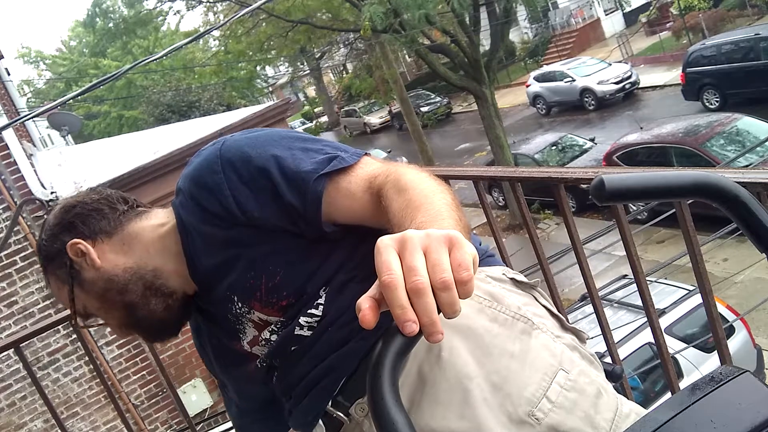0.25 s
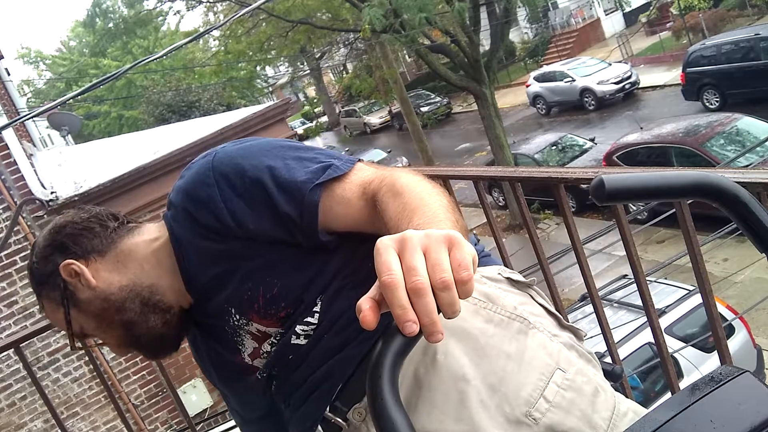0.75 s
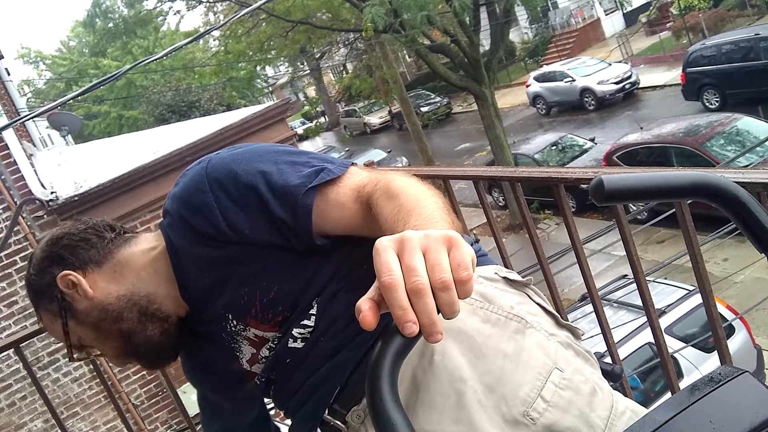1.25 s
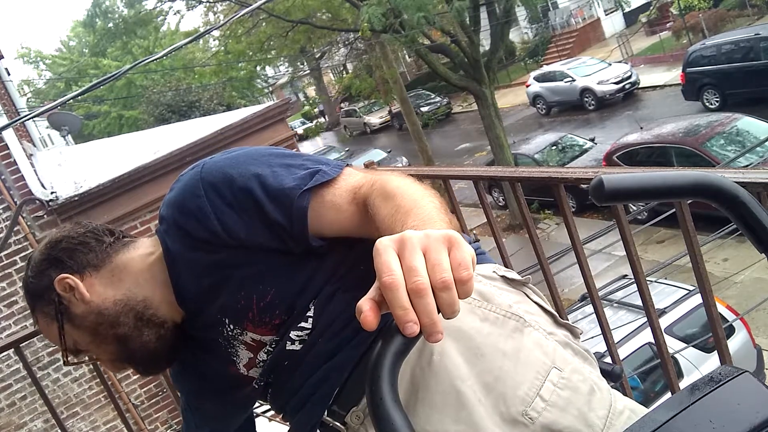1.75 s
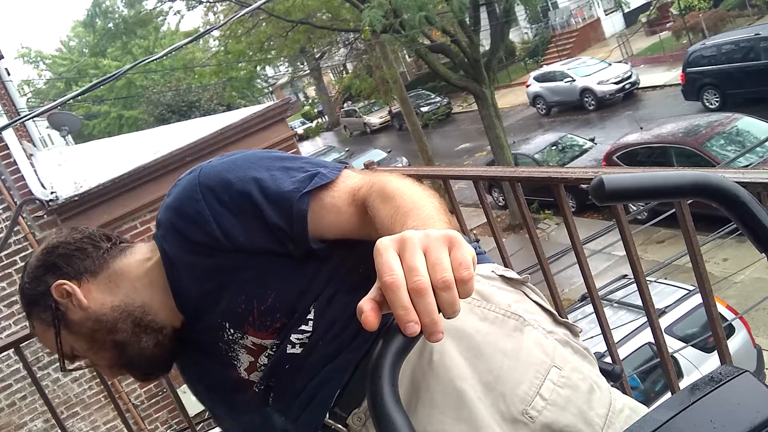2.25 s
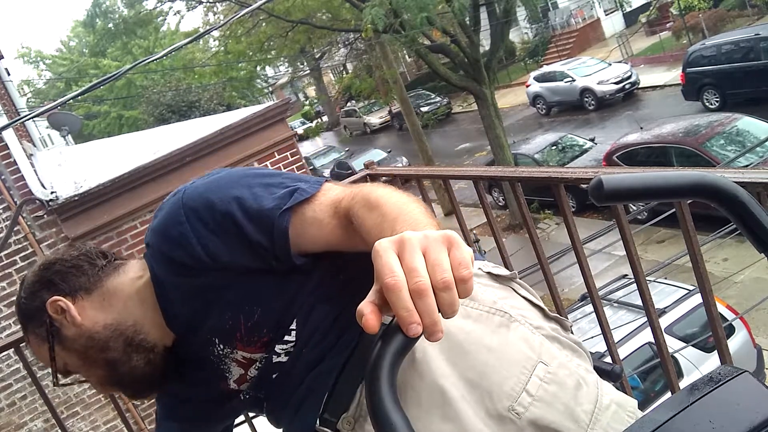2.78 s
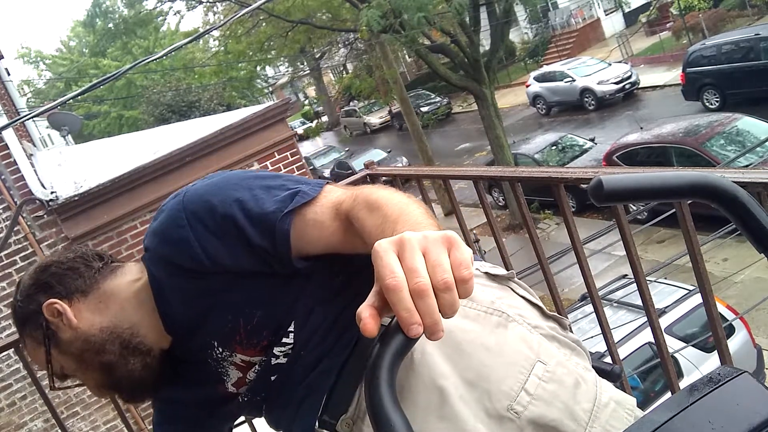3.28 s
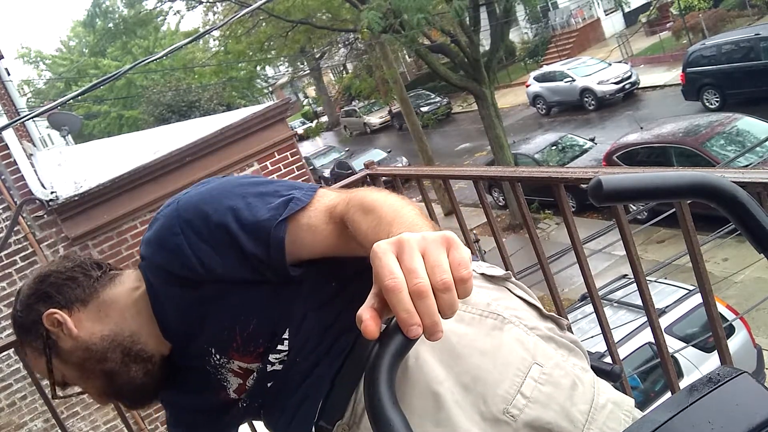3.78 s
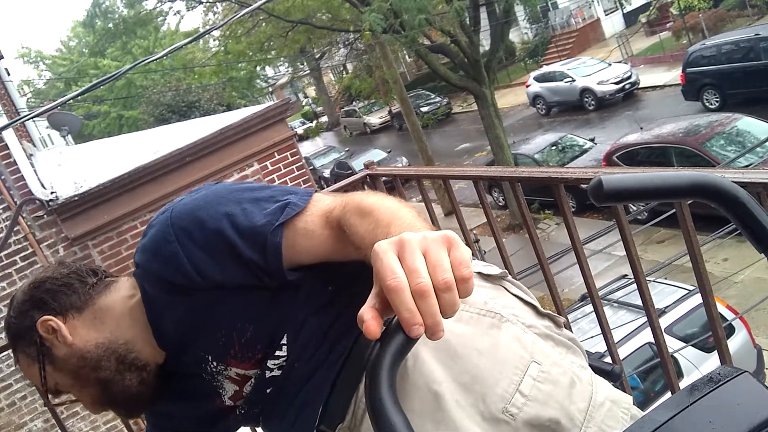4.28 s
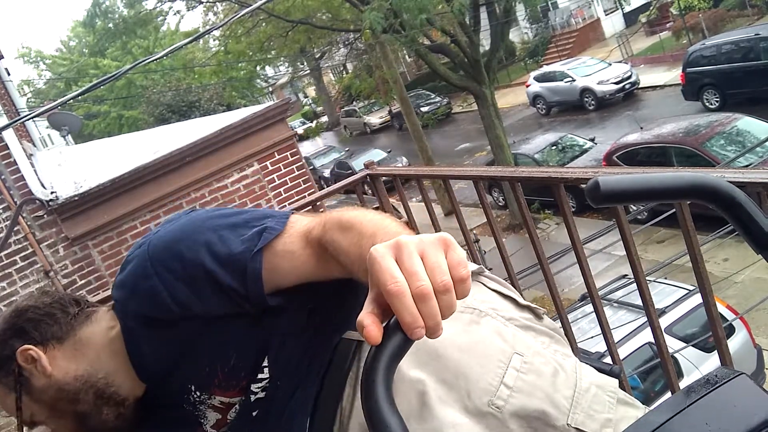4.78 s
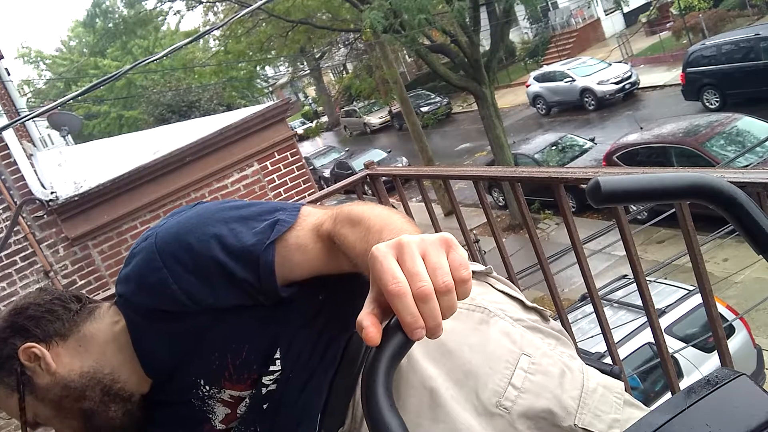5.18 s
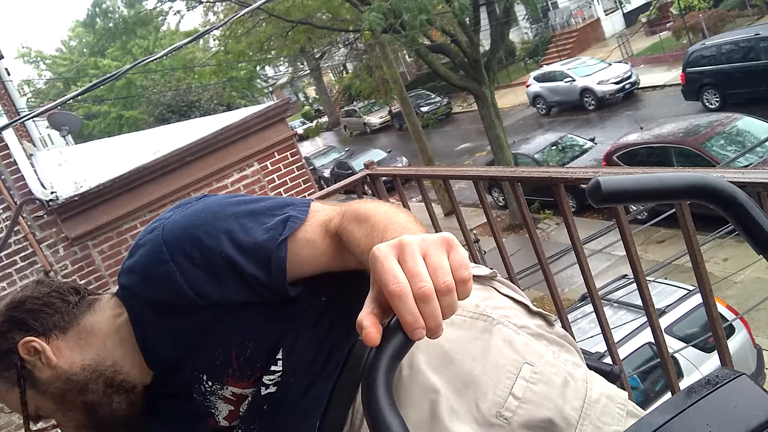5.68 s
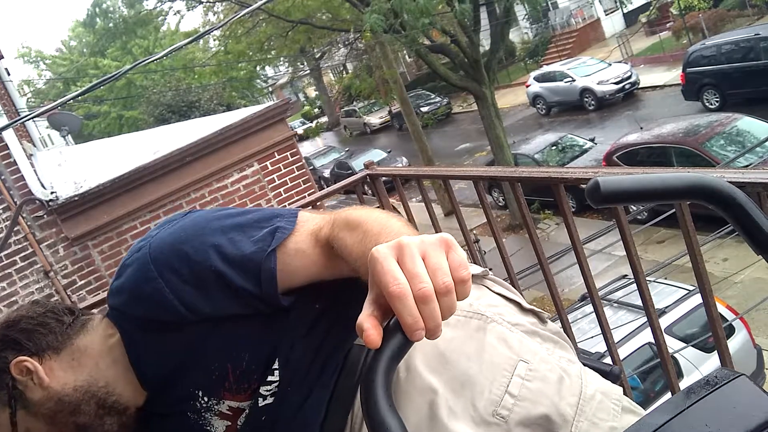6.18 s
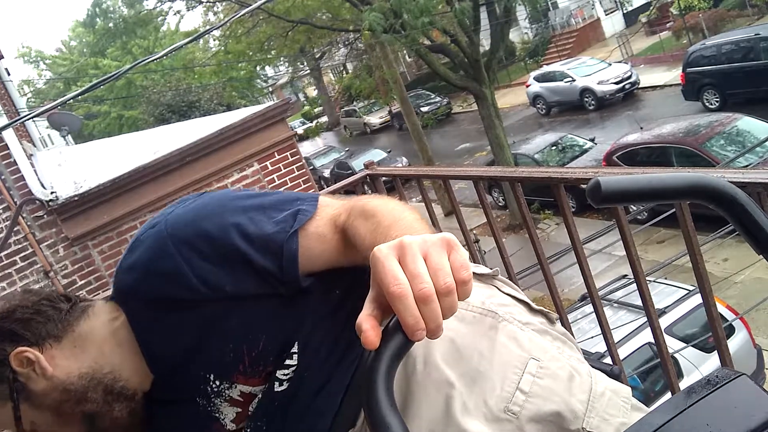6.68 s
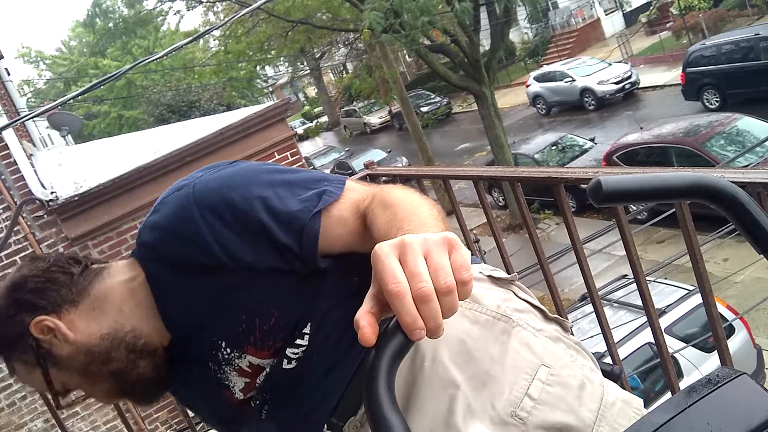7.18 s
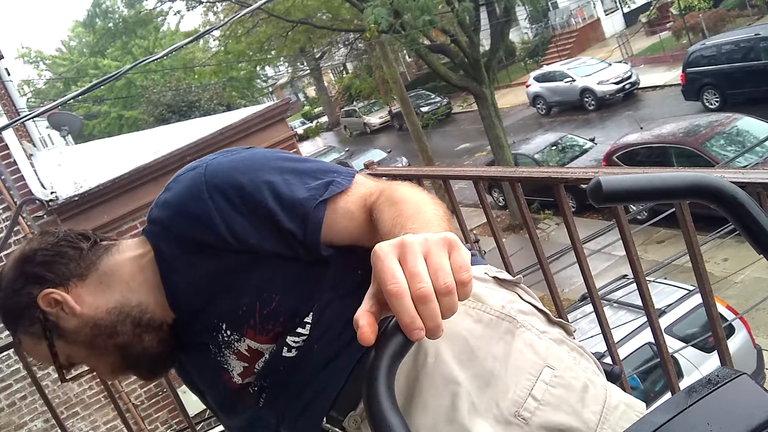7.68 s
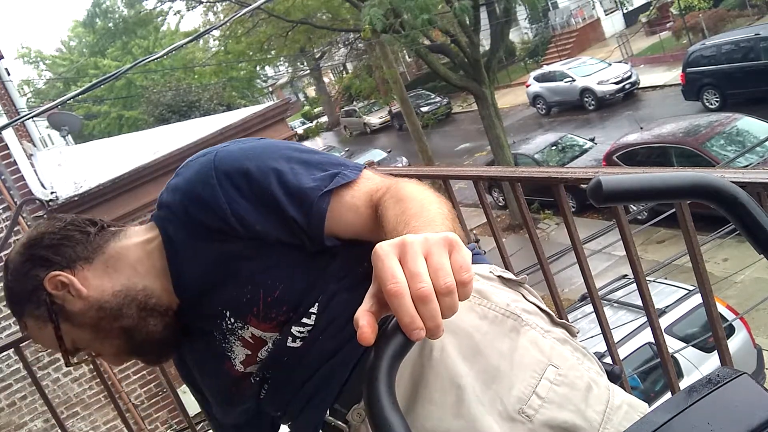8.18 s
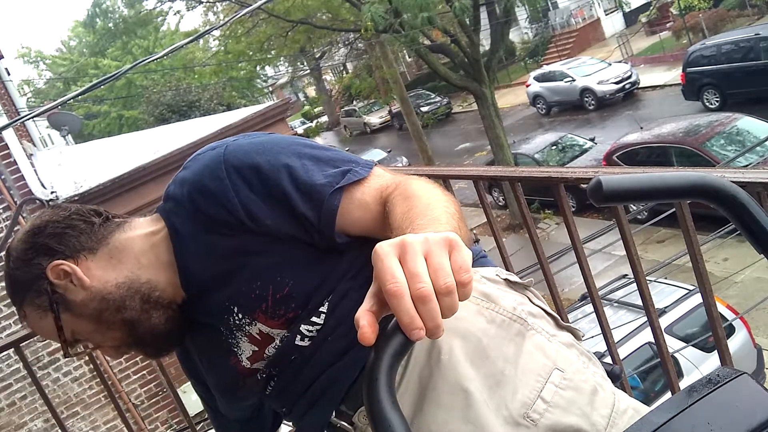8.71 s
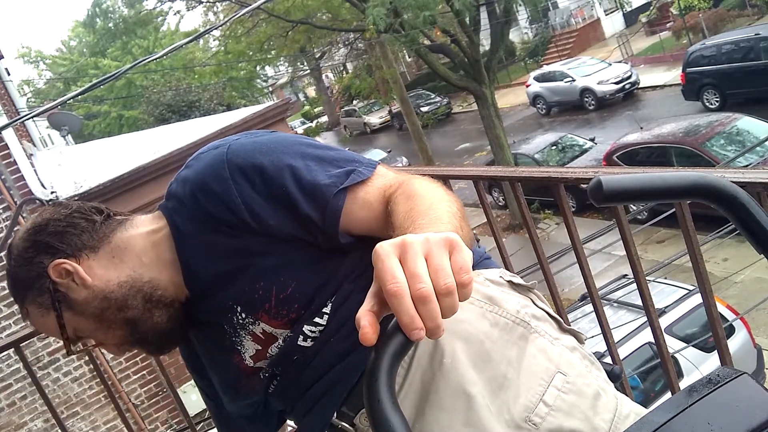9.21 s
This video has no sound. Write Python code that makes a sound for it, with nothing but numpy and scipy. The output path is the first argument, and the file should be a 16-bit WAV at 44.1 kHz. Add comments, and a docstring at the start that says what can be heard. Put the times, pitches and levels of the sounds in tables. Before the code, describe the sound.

Close, gritty metal clacks open the scene over distant tyre noise on wet asphalt. One buzzing car horn of under a second follows, its tail smeared by house fronts. Another sharp rattle comes soon after two seconds, briefly pushing the traffic down. Then cars swell past with hiss and fine spray, peaking past the middle and easing off. Outdoor balcony, stereo handheld microphone, light low wind.

```python
"""A wet residential street from a balcony: traffic swells and fades, tyres roaring and hissing as shaped noise.
Spray sizzles as flickering high noise, engines and a faint hum are gliding or steady tones, wind is low noise.
A car horn, a stack of partials, sounds once and rings between the houses; thin squeaks come and go.
A metal frame close to the microphone clacks a number of times, with ringing modes and noisy rattle;
the sharpest clacks push the recorder's gain down, and the street swells back slowly."""
import sys
import numpy as np
from scipy import signal
from scipy.fft import rfft, irfft, next_fast_len
from scipy.io import wavfile
from scipy.ndimage import uniform_filter1d, minimum_filter1d

SR = 44100
rng = np.random.default_rng(int(sys.argv[2]) if len(sys.argv) > 2 else 0)


def waveform_to_disk(signal):
    """Save audio, clipped to [-1, 1], as 16-bit WAV at the path in sys.argv[1]."""
    frames = np.transpose(np.atleast_2d(signal))
    scaled = np.clip(frames, -1, 1) * 32767
    samples = np.round(scaled).astype(np.int16)
    wavfile.write(sys.argv[1], SR, samples)


N = 416744
T = np.arange(N) / SR

# swells of traffic: peak t/s, half-power time/s before reach, road roar level/dB, tyre hiss level/dB,
# spray level/dB (levels before the trims in tyres and spray)
TRAFFIC_SWELLS = [(.1, .4, -32.5, -41.5, -53.5), (1.7, .7, -28.7, -40.5, -53), (2.8, .5, -31, -38, -48),
                  (4.3, .7, -27.2, -34.8, -44.5), (4.72, .15, -31, -44, -52), (5.15, .3, -34, -35, -41),
                  (6.12, .55, -26, -28.8, -37.3), (7.3, .38, -28.2, -39.5, -45.5),
                  (8.56, .28, -28.7, -40.5, -49), (9.4, .13, -32.5, -51, -57)]
# steady traffic under them: road roar level/dB, tyre hiss level/dB, spray level/dB (before the same trims)
FAR_TRAFFIC = (-32.5, -47, -53)
# factor on the half-power time: roar, hiss, spray
REACH = (1.05, .8, .95)
SWELL_FALLOFF = 1.4  # exponent; a higher one makes the far skirts of a swell fall faster


def traffic():
    """Gains of roar, hiss and spray: each swell's power rises and falls about its peak, over far traffic."""
    power = from_db(FAR_TRAFFIC)[:, None] ** 2
    for peak_s, half_s, *levels_db in TRAFFIC_SWELLS:
        away = (T - peak_s) / (half_s * np.array(REACH)[:, None])
        # the power is halved where away is 1 or -1
        falloff = (1 + away ** 2 * (2 ** (1 / SWELL_FALLOFF) - 1)) ** SWELL_FALLOFF
        power = power + from_db(levels_db)[:, None] ** 2 / falloff
    return np.sqrt(power)


# spectrum of the tread's roar: f/Hz, relative level/dB
ROAR_COLOUR = [(25, -39), (45, -21), (62, -11), (85, -1), (135, -5), (200, 0), (300, 0.5), (540, -0.5),
               (600, 1), (650, 0), (920, -1), (1250, -8.5), (1800, -18.5), (4000, -54)]
# spectrum of the wet hiss: f/Hz, relative level/dB
HISS_COLOUR = [(600, -24), (1200, -4), (1550, 1), (2000, -2), (2600, .5), (3300, -6.7), (4200, -11.5),
               (5000, -15.5), (6200, -26), (9000, -19), (16000, -50)]


def tyres(roar, hiss, roar_db=0.0, hiss_db=2.5, sway_db=0.68, flutter_db=1.36):
    """Tread roars on the asphalt and hisses as it squeezes out the water film."""
    roar_gain = roar * from_db(roar_db + sway_db * drift(12))
    hiss_gain = hiss * from_db(hiss_db + flutter_db * drift(10.7))
    return roar_gain * noise(ROAR_COLOUR) + hiss_gain * noise(HISS_COLOUR)


# spectrum of the spray that follows the traffic: f/Hz, relative level/dB
SPRAY_COLOUR = [(2000, -18), (4000, -6), (5300, -3), (6500, -3), (8500, -.5), (11000, -2), (14000, -3.5),
                (15300, -6), (16000, -18)]
# spectrum of the brighter spells: f/Hz, relative level/dB
SIZZLE_COLOUR = [(2000, -20), (4000, -5), (5400, -6), (6500, -3.5), (8500, 0), (11000, -2), (14000, -4),
                 (15300, -6.5), (16000, -18)]
# spells of high sizzle: start t/s, length/s, level/dB before the spray trim
SIZZLES = [(0, .2, -48), (.45, .033, -32.5), (2.02, .13, -42), (7.05, .2, -42), (7.45, .44, -40.5),
           (8.08, .87, -43), (9.31, .2, -46.5)]


def spray(thrown, level_db=.3, flutter_db=1.17, drops_per_s=120, drop_size=0.5, drop_s=0.00043):
    """A fine sizzle follows the traffic, with brighter spells; droplets stand out for about a millisecond."""
    spells = sum(from_db(db) * held(s, length, attack=.016, release=.035) for s, length, db in SIZZLES)
    drops = (rng.random(N) < drops_per_s / SR) * rng.exponential(drop_size, N)
    drop_decay = np.exp(-1 / (drop_s * SR))
    patter = rms_one(1 + signal.lfilter([1], [1, -drop_decay], drops + 1e-18))
    sizzle = thrown * noise(SPRAY_COLOUR) + spells * noise(SIZZLE_COLOUR)
    return from_db(level_db + flutter_db * drift(16)) * patter * sizzle


# reflections from the balcony's walls and floor: delay t/s, level/dB
WALLS = [(.0067, -23), (0.0148, -16), (0.0263, -20.5)]


def balcony(x):
    """Nearby walls add short echoes, which ripple the spectrum."""
    echoes = sum(from_db(db) * np.pad(x, [(0, 0), (round(s * SR), 0)])[:, :N] for s, db in WALLS)
    return x + echoes


# swelling groups of horn partials: centre f/Hz -> (t/s, relative level/dB)
SWELLS = {398: [(.55, 3), (.62, 0), (.9, -1), (1.11, 2), (1.25, 0)], 2780: [(.55, 4), (.6, 1), (.78, 6),
          (.85, -1), (.9, 1), (.94, -6), (1.0, 2), (1.17, 2), (1.3, -2)], 3160: [(.57, -4), (.61, 6),
          (.66, 0), (.72, 3.5), (.79, -2), (.89, -.5), (1.04, -.5), (1.13, 3.5), (1.25, 1), (1.5, -1)],
          3560: [(.55, 2), (.6, -1), (.64, 5), (.76, 1), (.83, 1), (.96, -3), (1.02, 1), (1.14, 0),
          (1.19, 9), (1.27, -1), (1.33, 5), (1.48, 0)], 4010: [(.64, 6), (.72, 0), (.8, -1), (.92, 6),
          (1.0, 1), (1.18, 4), (1.45, 2)]}


def swell(hz, t):
    """The loudest groups of horn partials swell and sink, each in its own way, as a gain over time."""
    curves = [curve for centre, curve in SWELLS.items() if abs(hz / centre - 1) < .03]
    return from_db(sum(np.interp(t, *np.transpose(curve)) for curve in curves))


# strong harmonics of the main horn: number, level/dB before the horn trim, left minus right level/dB
HORN = [(1, -28.7, -7), (2, -46, -2), (4, -61, -7), (5, -47.5, -4), (6, -43, -4), (7, -34, -3),
        (8, -21.5, -5.5), (9, -27, -1.5), (10, -43.5, -5), (11, -47, -2), (12, -53, -3), (19, -55, -4),
        (21, -53, -1), (22, -60, -5), (27, -56, -11), (28, -54, -15), (30, -56, -16), (31, -55, -12)]
# tones of its weaker companion: f/Hz, level/dB before the horn trim, left minus right level/dB
SECOND_HORN = [(2665, -46.5, -2), (2945, -52, -3), (3112, -33.5, -9), (3541, -39, -2), (3557, -35.5, -2),
               (3811, -49, -4), (4002, -46, -4), (4024, -35.5, -4), (4447, -55, -3)]
# spectrum of the horn's rasp: f/Hz, relative level/dB
RASP_COLOUR = [(900, -35), (1500, -12), (2100, -13), (2700, -4), (3200, -11), (3600, -0.5), (4100, -12),
               (4700, -16), (7000, -26), (9000, -21), (12000, -22), (16000, -32)]
HORN_HZ, DIAPHRAGM_HZ = 397.8, 3580  # fundamental; the diaphragm's own resonance
BUZZ_DB, BUZZ_PAN_DB = -63, -5  # all other harmonics: level before the horn trim, left minus right
# one press: the diaphragm's resonance speaks at once, the other partials join at full voice
HORN_START_S, HORN_LENGTH_S, HORN_ATTACK_S, HORN_RELEASE_S = .512, .693, .005, .016
FULL_VOICE_S = 0.605
JITTER_S = 4.5e-6  # spread of the fast timing error; the slow one is twice as wide
WAVER_DB, WAVER_HZ, SMEAR_HZ = 1.3, 14, 22  # waver is reduced for low partials


def horn(level_db=2.2, ring_cycles=23, wet_db=-6.3, street_t60=1.2, echo_s=0.19, echo_blur_s=.04,
         echo_db=-12, early_db=-16, rasp_db=-36.5, scatter_hz=1500, resonant_share=.08, count=36):
    """Two buzzing diaphragms have close partials that beat; house fronts return them smeared at each ear."""
    t = T[:int(2.3 * SR)]
    press = held(HORN_START_S, HORN_LENGTH_S, HORN_ATTACK_S, HORN_RELEASE_S, t)
    # power that lingers in the street, with one blurred echo
    keep = from_db(-120 / (street_t60 * SR))
    lingering = signal.lfilter([1 - keep], [1, -keep], press ** 2)
    echo = held(HORN_START_S + echo_s, HORN_LENGTH_S, echo_blur_s, echo_blur_s, t)
    diffuse = np.sqrt(from_db(wet_db) ** 2 * lingering + (from_db(echo_db) * echo) ** 2)
    # the contact breaker keeps uneven time, which roughens all partials together
    clock = t + JITTER_S * (drift(180, t) + 2 * drift(24, t))
    swelling = from_db(early_db * np.clip((FULL_VOICE_S - t) / .015, 0, 1))
    out = from_db(rasp_db) * (press * swelling + diffuse) * noise(RASP_COLOUR)[:, :len(t)]

    strong = {round(k): (db, pan_db) for k, db, pan_db in HORN}
    harmonics = [(k * HORN_HZ, *strong.get(k, (BUZZ_DB, BUZZ_PAN_DB))) for k in range(1, count + 1)]
    for hz, db, pan_db in harmonics + SECOND_HORN:
        # short waves are scattered most by trees and moving air
        scatter = hz / (hz + scatter_hz)
        # low partials build up and die away more slowly
        ring_s = ring_cycles / hz
        voiced = held(HORN_START_S, HORN_LENGTH_S, HORN_ATTACK_S + ring_s, HORN_RELEASE_S + ring_s, t)
        phases = 2 * np.pi * rng.random() - np.arccos(port_comb(hz)) * np.array([[1], [0]])
        waver = from_db(WAVER_DB * scatter * drift(WAVER_HZ, t))
        direct = voiced * waver * np.exp(1j * phases)
        ears = np.array([drift(SMEAR_HZ, t) + 1j * drift(SMEAR_HZ, t) for ear in range(2)])
        smeared = ears * np.sqrt(scatter / 2)
        # the partials on the diaphragm's own resonance speak first
        resonant = abs(np.log(hz / DIAPHRAGM_HZ)) < .05
        onset = swelling ** (resonant_share if resonant else scatter)
        tone = np.real((direct + diffuse * smeared) * np.exp(2j * np.pi * hz * clock))
        gain = np.sqrt(2) * from_db(db + level_db) * onset * swell(hz, t)
        out = out + gain * tone * panned(pan_db)
    return np.pad(out, [(0, 0), (0, N - len(t))])


# clacks close to the microphone: t/s, contact level/dB (peak at the right port), frame ring level/dB before
# the trims of modes and rattle, tilt of the modes in dB per octave, set by where the blow lands
CLACKS = [(.012, -17, -38, 0), (.023, -22, -42, 0), (.056, -40, -29, -5), (.092, -26, -32, 0),
          (.0965, -5, -14, -2), (.1005, -16, -20, -1), (.147, -11, -14.5, -4), (.2235, -32, -22, -4),
          (.2295, -30, -23, -4), (.242, -23, -29, -2), (.5605, -1.5, -22, 8), (1.3003, -18, -48, 0),
          (1.412, -21, -52, 0), (2.357, -3.5, -18, 5), (2.3595, -12, -19, 4), (2.367, -28, -27, -2),
          (2.393, 12, -17, 4), (2.399, -10, -14, 4), (2.407, -13, -10.5, 1), (2.9757, -18, -48, 0),
          (4.4753, -16, -48, 0), (4.7555, -3.5, -24, -9), (7.1348, -18, -48, 0), (8.8968, -3, -36, -6)]
# modes of the hard contact: f/Hz, relative level/dB, t60/s
CONTACT = [(3150, -14, 0.004), (5800, -6, 0.0014), (8600, -1, 0.0018), (10600, 1.5, 0.0014),
           (12400, 2, .0014), (14200, 0, .0014)]
# modes of the frame: f/Hz, relative level/dB, t60/s
FRAME_MODES = [(1350, -4, .07), (1790, -1, .06), (2850, -1, .07), (3120, 2, .08), (3430, 4, .08),
               (3680, -1, .08), (4100, -1, .07), (4570, -3, .05), (5800, -1, .04), (6300, -2, .04)]
# spectrum of the loose rattle: f/Hz, relative level/dB
FRAME_COLOUR = [(200, -17), (800, -10), (1400, -2.5), (2200, -7.5), (3300, -1), (4500, -1), (6000, -6),
                (8000, -14), (16000, -37)]
# spectrum of the treble tick: f/Hz, relative level/dB
TICK_COLOUR = [(2000, -20), (5000, -19), (8400, 7.5), (11000, 5), (14000, -5), (16000, -3)]
TICK_DB, TICK_FOLLOWS = -21, .45  # tick of a 0 dB contact; dB it gains per dB of contact
RATTLE_T60_S, RATTLE_DOUBLES_DB = .085, 30  # t60 for a 0 dB ring; it doubles for each such step in ring
AFTER_RING_DB, AFTER_RING_T60_S = -21, .17  # what lingers between the balcony's walls, relative to the rattle
FRAME_MID_HZ = 3700  # the modes tilt about this pitch


def clacks(tick_share=.9, rise_s=0.0006, pan_db=-10, modes_db=-7.5, rattle_db=-3.5, grain_db=2.,
           uneven_db=1.8):
    """A hard contact rings the frame's modes unevenly and shakes loose a gritty rattle; its treble dies first."""
    t = T[:SR // 2]
    contact = np.zeros(len(t))
    for k, (hz, db, t60) in enumerate(CONTACT):
        contact += (-1) ** k * from_db(db - 60 * t / t60) * np.sin(2 * np.pi * hz * t)
    contact /= np.abs(contact).max()
    rise = 1 - np.exp(-t / rise_s)
    snaps, modes, rattles, ticks = np.zeros((4, N + len(t)))
    for s, contact_db, ring_db, tilt in CLACKS:
        tick_db = TICK_DB + TICK_FOLLOWS * contact_db
        rattle_t60 = RATTLE_T60_S * 2 ** (ring_db / RATTLE_DOUBLES_DB)
        span = slice(round(s * SR), round(s * SR) + len(t))
        snaps[span] += from_db(contact_db) * contact
        for hz, db, mode_t60 in FRAME_MODES:
            tilt_db = tilt * np.log2(hz / FRAME_MID_HZ)
            strength_db = ring_db + modes_db + db + tilt_db + uneven_db * rng.standard_normal()
            ringing = np.sin(2 * np.pi * (hz * t + rng.random()))
            modes[span] += rise * from_db(strength_db - 60 * t / mode_t60) * ringing
        decay = from_db(-60 * t / rattle_t60) + from_db(AFTER_RING_DB - 60 * t / AFTER_RING_T60_S)
        rattles[span] += rise * from_db(ring_db + rattle_db) * decay
        ticks[span] += rise * from_db(tick_db - 60 * t / (rattle_t60 * tick_share))
    grit = rms_one(from_db(grain_db * drift(290)))
    loose = grit * (rattles[:N] * noise(FRAME_COLOUR, shared=.5) + ticks[:N] * noise(TICK_COLOUR))
    return (snaps + modes)[:N] * from_db([[pan_db], [0]]) + loose


# engines pulling: start t/s, length/s, firing rate f/Hz, its rise in Hz per s, level/dB (rms of the fundamental)
ENGINES = [(.33, 1.05, 79.5, 11, -37), (4.2, .5, 97, 9, -42), (5.15, .8, 106, 3, -39.5),
           (8.3, .25, 90, 0, -40)]
ENGINE_ATTACK_S, ENGINE_RELEASE_S = .1, .12


def engines(octave_db=-13, waver_db=1.3, wobble=0.012, pan_db=-4):
    """Each exhaust hums at its firing rate, steady or rising, with a weaker octave."""
    out = np.zeros(N)
    for s, length, hz, rise, db in ENGINES:
        rate = (hz + rise * np.clip(T - s, 0, length)) * (1 + wobble * drift(8.2))
        phase = 2 * np.pi * np.cumsum(rate) / SR
        level = held(s, length, ENGINE_ATTACK_S, ENGINE_RELEASE_S) * from_db(db + waver_db * drift(3.1))
        out += level * (np.sin(phase) + from_db(octave_db) * np.sin(2 * phase))
    return np.sqrt(2) * out * panned(pan_db)


# thin, very high squeaks: t/s, level/dB (peak)
SQUEAKS = [(3.42, -48), (4.82, -45), (5.19, -48), (5.27, -41), (5.59, -43), (5.95, -49), (6.32, -49)]
SQUEAK_HZ = 14180


def squeaks(length_s=.025, wobble=.004, pan_db=-5):
    """Brief, unsteady whistles at the top of hearing."""
    level = sum(from_db(db) * np.exp(-((T - s) / length_s) ** 2) for s, db in SQUEAKS)
    phase = 2 * np.pi * np.cumsum(SQUEAK_HZ * (1 + wobble * drift(120))) / SR
    return level * np.sin(phase) * panned(pan_db)


HUM_START_S, HUM_LENGTH_S, HUM_HZ, HUM_DB = 4.85, .7, 339, -43


def hum(wobble=.003, pan_db=-3):
    """A faint, almost steady tone from down the street comes and goes in the traffic."""
    phase = 2 * np.pi * np.cumsum(HUM_HZ * (1 + wobble * drift(8))) / SR
    level = from_db(HUM_DB) * held(HUM_START_S, HUM_LENGTH_S, ENGINE_ATTACK_S, ENGINE_RELEASE_S)
    return np.sqrt(2) * level * np.sin(phase) * panned(pan_db)


# spectrum of wind on the microphone: f/Hz, relative level/dB
WIND_COLOUR = [(25, -36), (38, -26), (52, -11), (80, 1.5), (180, 5.5), (300, -9), (600, 2), (2000, -60)]
# strength of the breeze at the microphone: t/s, level/dB
BREEZE = [(0, -43), (1.2, -39), (2.6, -43), (4.4, -38), (7.8, -36.5), (9.4, -40.5)]


def wind(gust_db=.8):
    """Wind touching the microphone makes lumpy low noise, separate at each port."""
    breeze_db = np.interp(T, *np.transpose(BREEZE))
    gusts = np.array([drift(2.6), drift(4)])
    return from_db(breeze_db + gust_db * gusts) * noise(WIND_COLOUR, shared=0)


COMB_HZ = 2490  # spacing of the in-phase bands


def port_comb(hz):
    """The microphone pair hears airborne sound in phase (1) and out of phase (-1) by turns along frequency."""
    return np.where(hz < COMB_HZ / 2, 1, -np.cos(2 * np.pi * hz / COMB_HZ))


# likeness of the microphone's ports: f/Hz, strength (limited to 1)
LIKENESS = [(60, 0), (130, 0.34), (300, 0.5), (700, .87), (1200, 0.86), (6200, 1.65), (8400, 0.7),
            (10000, 0.33), (15000, 0.7)]
# balance of the microphone's ports: f/Hz, left minus right level/dB
BALANCE = [(60, -5), (200, -4), (700, -2.5), (1300, -2), (3500, -0.4), (6000, -1.5), (8100, -2.5),
           (10000, -4.5), (15000, -7.5)]


def noise(colour, shared=1):
    """Stereo noise of rms 1 at the microphone pair; `shared` (0-1) is how far the ports hear the same sound."""
    size = next_fast_len(N, True)
    hz = np.arange(size // 2 + 1) * SR / size
    mid, side = rfft(rng.standard_normal((2, size)))
    alike = shared * port_comb(hz) * np.clip(at_hz(LIKENESS, hz), 0, 1)
    pair = np.sqrt(1 + alike) * mid + np.sqrt(1 - alike) * side * [[1], [-1]]
    coloured = pair * panned(at_hz(BALANCE, hz)) * from_db(at_hz(colour, hz))
    return rms_one(irfft(coloured, size)[:, :N])


def from_db(db):
    """Decibels to gain."""
    return 10 ** (np.asarray(db) / 20)


def rms_one(x):
    """Scale to unit power."""
    return x / np.sqrt(np.mean(np.abs(x) ** 2) + 1e-20)


def at_hz(points, hz):
    """Read a spectrum on a log-frequency axis."""
    freqs, values = np.transpose(points)
    return np.interp(np.log(np.maximum(hz, 1)), np.log(freqs), values)


def panned(pan_db):
    """Left and right gains of mean power 1."""
    gains = from_db(np.array([[.5], [-.5]]) * pan_db)
    return gains / np.sqrt(np.mean(gains ** 2, axis=0))


def drift(rate, t=T):
    """Smooth chance of spread 1 that changes about `rate` times a second."""
    grid = 2000  # points per second
    r = np.exp(-2 * np.pi * rate / grid)
    chance = rng.standard_normal(N * grid // SR + 2 * grid)
    # the first second lets the filter settle
    slow = signal.lfilter([1], [1, -2 * r, r * r], chance)[grid:]
    return np.interp(t * grid, np.arange(len(slow)), rms_one(slow))


def held(start, length, attack, release, t=T):
    """Rise, hold and exponential release, with time constants in seconds."""
    since = np.maximum(t - start, 0)
    rise = 1 - np.exp(-np.minimum(since, length) / attack)
    return rise * np.exp(-np.minimum(np.maximum(since - length, 0) / release, 40))


def scene():
    """The street below and the small sounds on the balcony."""
    roar, hiss, thrown = traffic()
    street = balcony(tyres(roar, hiss) + spray(thrown))
    return street + wind() + engines() + hum() + horn() + clacks() + squeaks()


def gain_control(x, threshold_db=-6.0, recovery_db_per_s=11., attack_s=0.005):
    """A peak over the threshold pulls the gain down; it creeps back at a steady rate."""
    over = np.maximum(20 * np.log10(np.abs(x).max(axis=0) + 1e-9) - threshold_db, 0)
    recovery = recovery_db_per_s * T
    reduction_db = np.maximum.accumulate(over + recovery) - recovery
    keep = np.exp(-1 / (attack_s * SR))
    return x * from_db(-signal.lfilter([1 - keep], [1, -keep], reduction_db))


def limiter(x, ceiling=0.62):
    """Catches the peaks that are too quick for the gain control."""
    allowed = np.minimum(1, ceiling / (np.abs(x).max(axis=0) + 1e-9))
    return x * uniform_filter1d(minimum_filter1d(allowed, size=25), size=25)


CUTOFF_HZ = 15600


def record(dry):
    """The recorder's gain control, limiter and steep top cut."""
    top_cut = signal.ellip(10, .2, 80, CUTOFF_HZ, fs=SR, output="sos")
    return signal.sosfilt(top_cut, limiter(gain_control(dry)))


dry = scene()
out = record(dry)
waveform_to_disk(out)
```